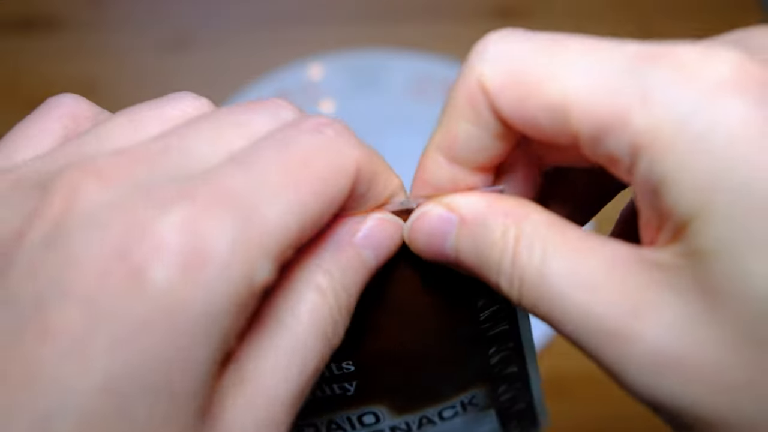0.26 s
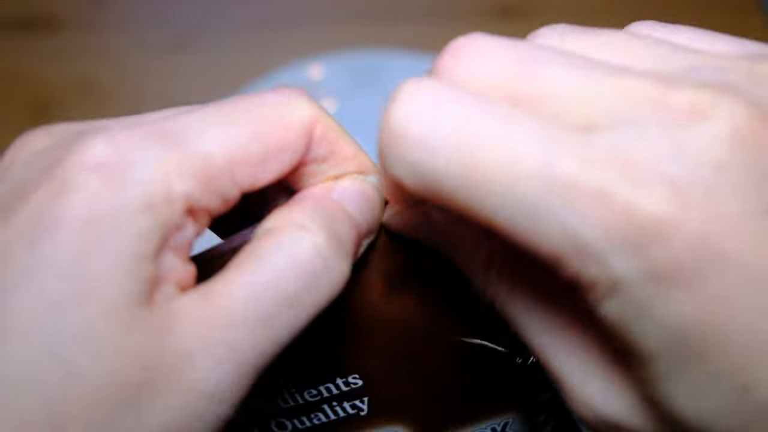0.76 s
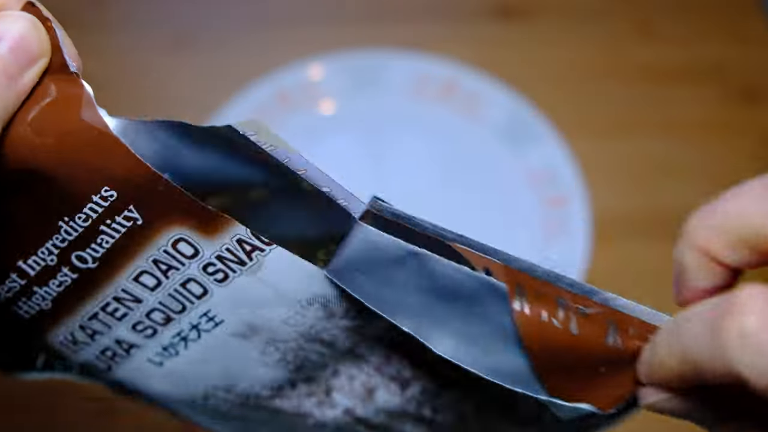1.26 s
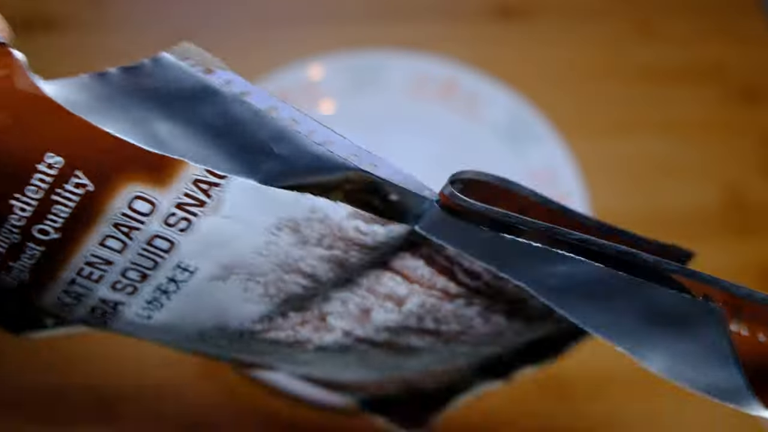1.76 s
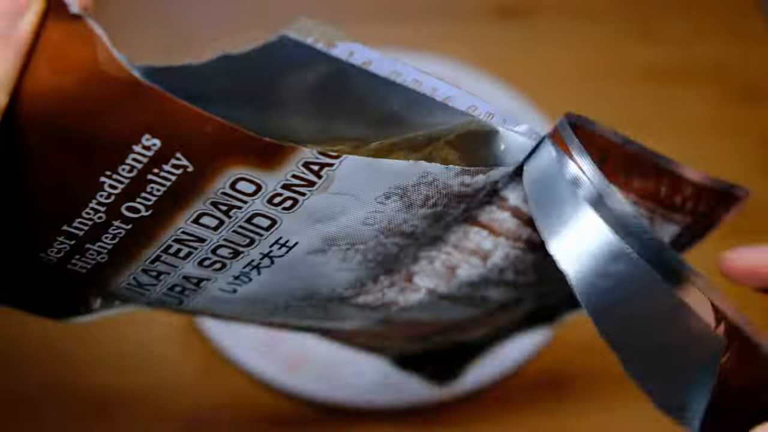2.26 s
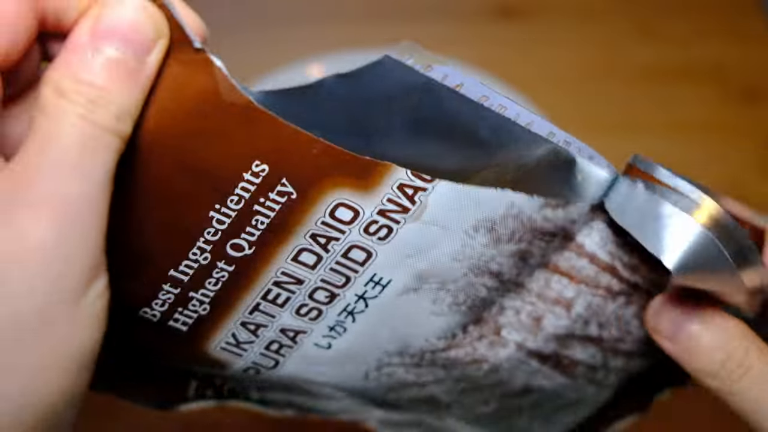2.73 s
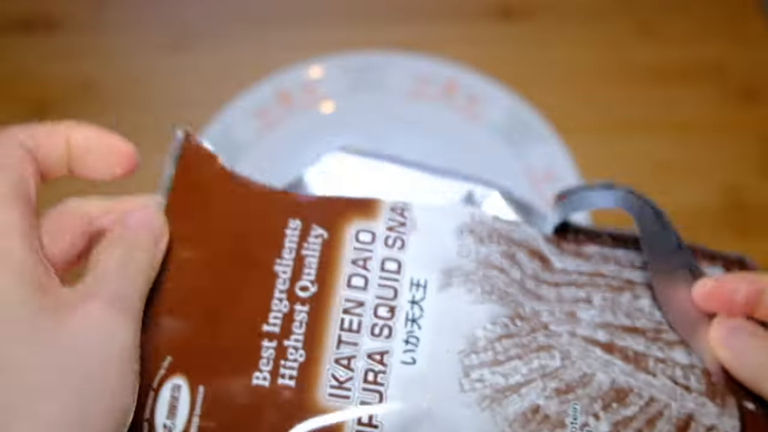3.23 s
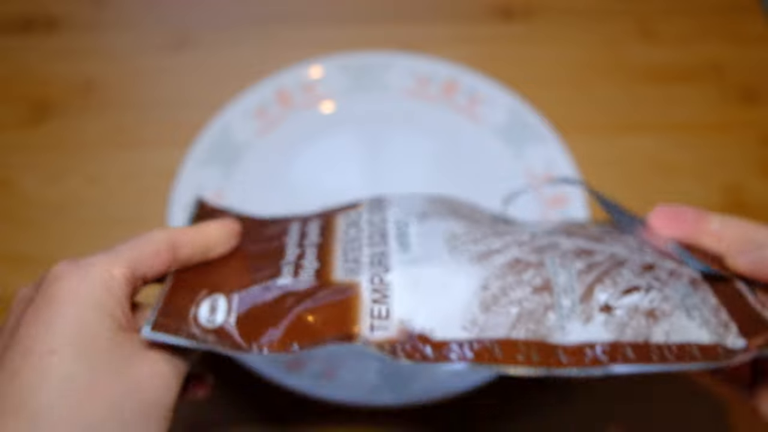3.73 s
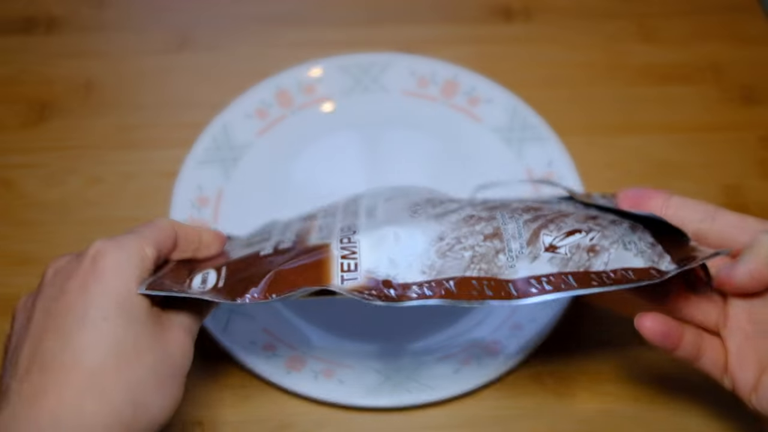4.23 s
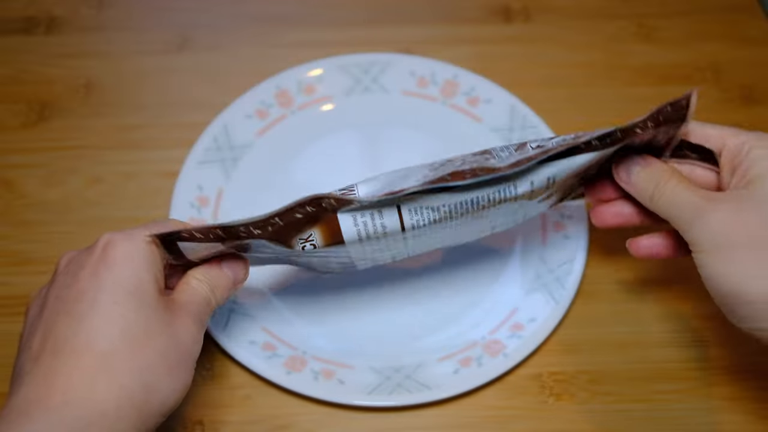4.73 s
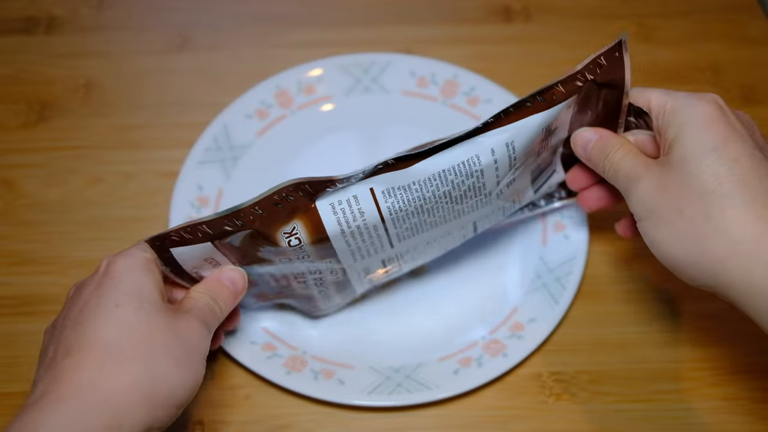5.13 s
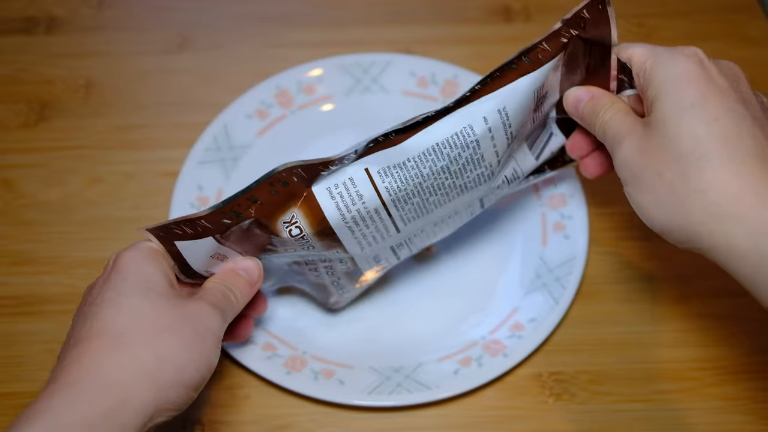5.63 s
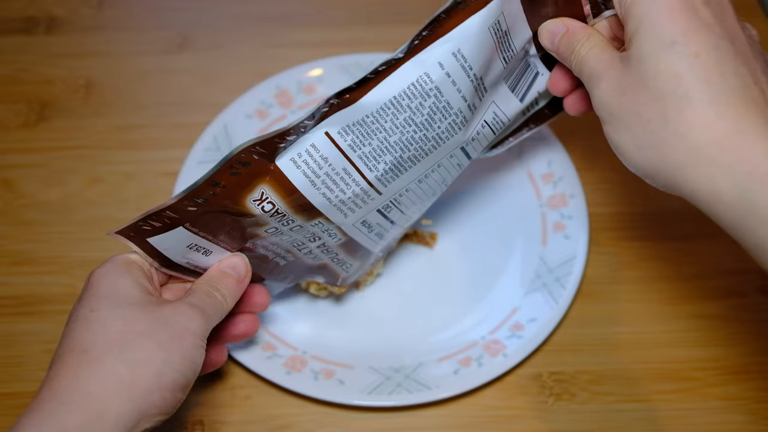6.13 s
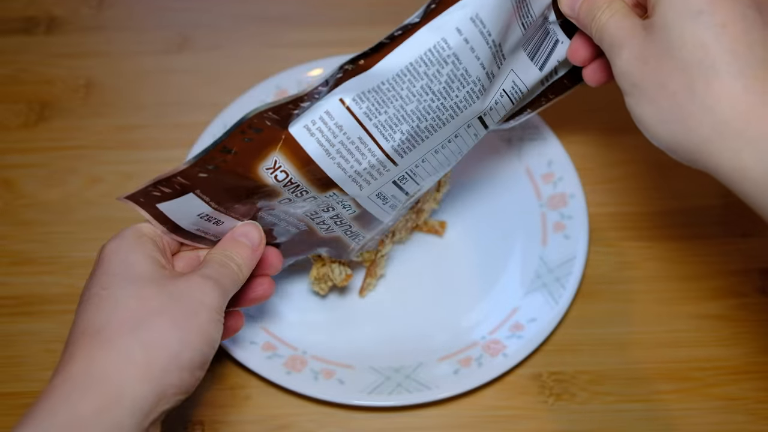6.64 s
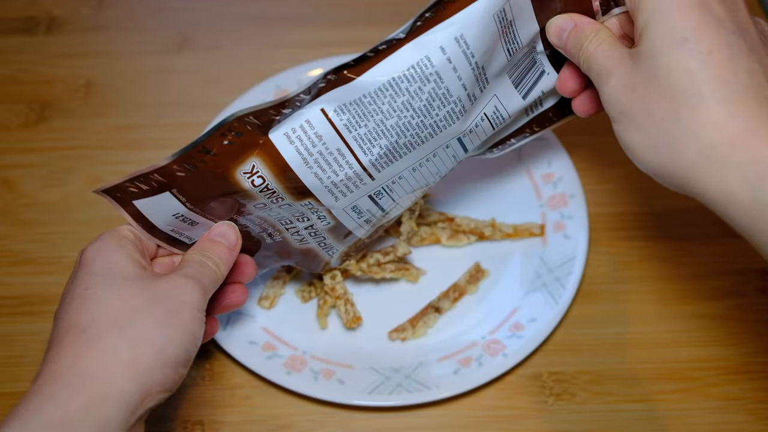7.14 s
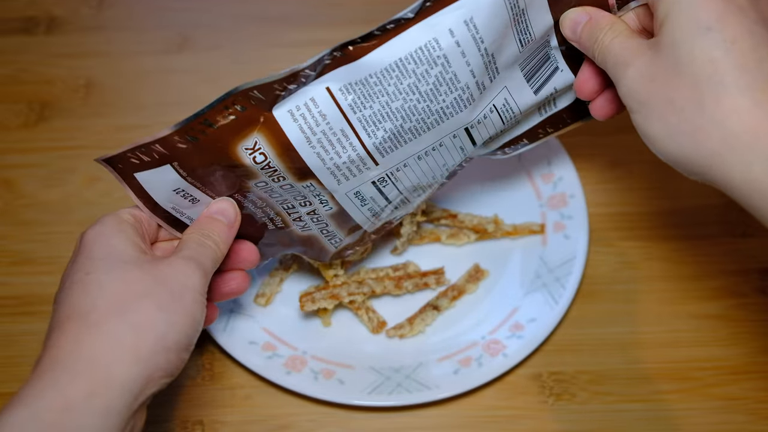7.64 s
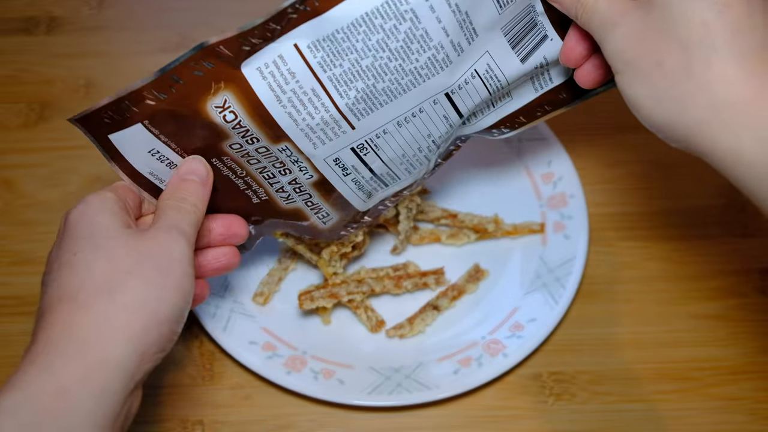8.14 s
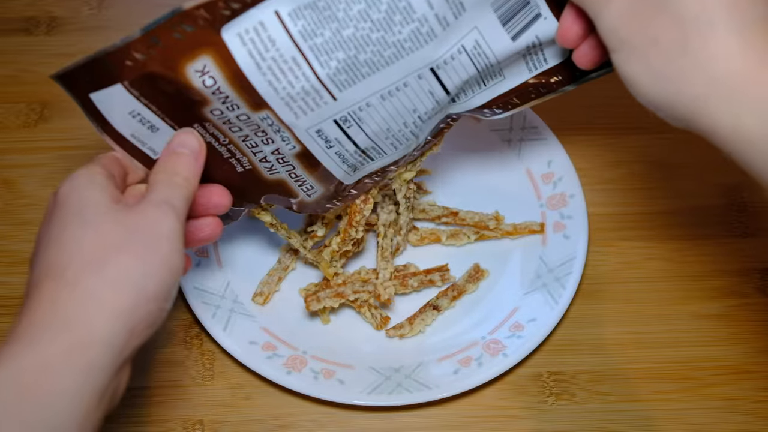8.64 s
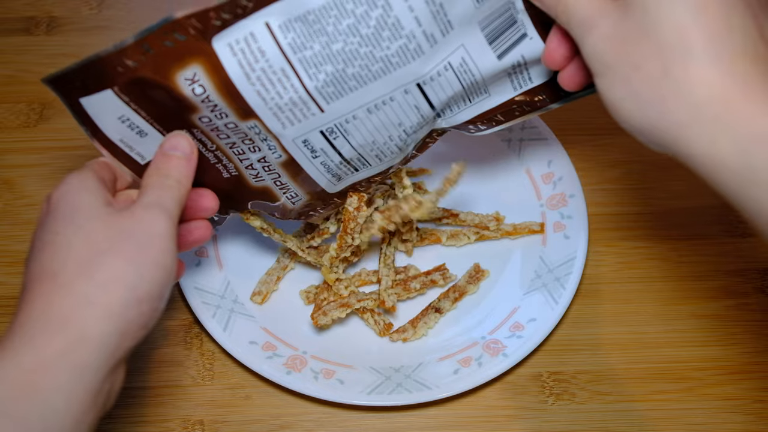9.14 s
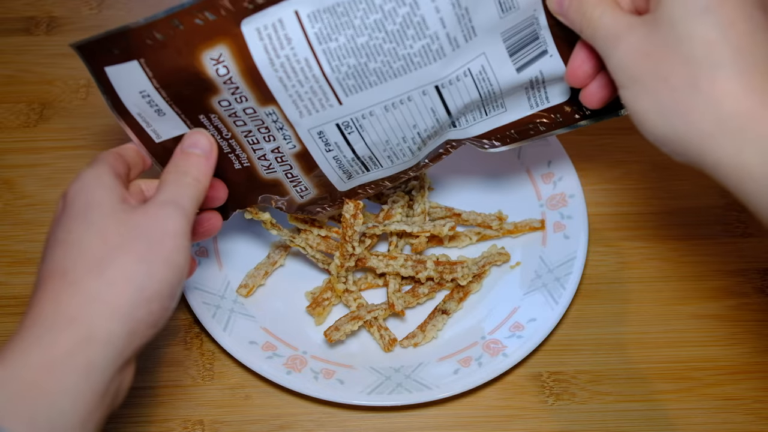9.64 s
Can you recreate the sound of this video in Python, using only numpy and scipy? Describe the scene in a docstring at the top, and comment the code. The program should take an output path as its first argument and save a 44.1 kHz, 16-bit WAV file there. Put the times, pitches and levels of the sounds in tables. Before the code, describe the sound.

Close up in a small quiet room, hands pinch and tear a foil-lined plastic bag: dry snaps, rustling, hollow film pops and a short bright rip. Crackling grows dense as the bag is handled, then thins. Dry crisp strips scrape out and land on a china plate with light clicks and short dull rings, becoming sparse and faint. Close stereo microphone, soft low room rush.

```python
"""Opening a snack bag over a plate

A foil-lined bag is pinched, torn open and tipped over a china plate, close to a stereo microphone in a small room.
Clicks make the snaps of the stiff film, short sine tones its hollow pops, bright noise the tearing seam.
Streams of tiny clicks make the rustle under each grip and the scrape of strips sliding out.
Dry, crisp strips land with a click and a ring of the plate; changing echoes and steady noise make the room."""
import sys
import numpy as np
from scipy import signal
from scipy.fft import rfft, irfft, next_fast_len
from scipy.io import wavfile
from scipy.ndimage import uniform_filter1d, map_coordinates

SR = 44100
rng = np.random.default_rng(int(sys.argv[2]) if len(sys.argv) > 2 else 0)


def store_pcm(level_fs):
    """Save levels as 16-bit WAV."""
    pcm = np.round(np.clip(level_fs, -1, 1) * 32767).astype(np.int16)
    wavfile.write(sys.argv[1], SR, np.atleast_2d(pcm).T)


N = 436149  # length of the scene in samples
TAPS = 2048  # length of one click in samples

# the film buckles: t/s, level/dB, panel flex/dB re level, crack/dB re level, flutter after the buckle/dB
BUCKLES = [(0.1337, -35.5, -5, -15, -4.5), (0.151, -27.5, -18, -21, 12), (0.1581, -22, -12.5, -6, 20),
           (0.3524, -48, 0, -27, 3), (0.4289, -35.5, -7.5, -16, -1), (0.4447, -36, -1, -22, 5),
           (0.5323, -43, -8, -23, -2), (0.566, -34.5, -1, -22, 2), (0.581, -39, -4, -22, 2),
           (0.613, -20.5, -9.5, -12.5, 16), (0.6847, -38.5, -3, -19, 13), (0.7742, -27.5, 2, -9.5, -8),
           (0.79, -32, -11, -24, 5), (0.829, -25, -13, -15, -8), (0.854, -26, -15, -21, -5),
           (0.9849, -26.5, -11, -7, -10), (1.0144, -42, 1, -14, 12), (1.0608, -23.5, -10, -6.5, -4),
           (1.0809, -21.5, -2, -6, 17), (1.1286, -24, -19, -12, -4), (1.145, -32.5, 3, -10, 9),
           (1.167, -33, -16, -13, -6), (1.2515, -28, -10.5, -21, 15), (1.2993, -37, -14, -19, 1),
           (1.3609, -50.5, 12, -3, 11), (1.4103, -41.5, -8, -26, 1), (1.455, -20.5, -5, -13, 7),
           (1.474, -20.5, -11, -8, 6), (1.6032, -35, -0.5, -34, -2), (1.6132, -30.5, -5.5, -14, 2),
           (1.7263, -28, -2, -8, -14), (1.77, -36, -8, -8, 7), (1.909, -34.5, 0, -20, 8),
           (1.916, -30.5, -1.5, -11, 14), (2.005, -34.5, -6, -33, 1), (2.024, -26.5, -4.5, -6.5, 2),
           (2.0633, -23.5, -16, -17.5, -2), (2.1162, -33.5, -1, -18, 8), (2.132, -47, -6, -1, -4),
           (2.2003, -37.5, -1, -2, 15), (2.277, -45.5, -2, -2, 1), (2.5329, -48.5, 6, -13, 3),
           (2.5847, -46.5, 4, -4, 8), (2.602, -26.5, -11, -4, -4), (2.6192, -33.5, -13, -28, 0),
           (2.673, -41, 12.5, -6, -4), (2.703, -48, -7, 10, -9), (2.7419, -38, -3, 3, 0),
           (2.7545, -29, -2, -14, -3), (2.79, -30.5, -1, -38, 2), (2.807, -24.5, -10, -8, 5),
           (2.817, -32, 2, -0.5, -2), (2.846, -35, -4, -22, -6), (2.87, -35, -5, -13, -7),
           (2.8746, -19, -13, -13.5, 15), (2.886, -27, -5.5, -7, 3), (2.8908, -29, 4.5, -0.5, -7),
           (2.9628, -26, -2.5, -5, 2), (2.9729, -36, -2, -21, 0), (2.986, -33.5, -3, -15, -12),
           (3.1011, -20, -5, -16, 2.5), (3.1352, -29, -11, -13, -3), (3.154, -19.5, -18, -13.5, -8),
           (3.165, -22.5, -16, -38, 12), (3.214, -31, -8, -33, -3), (3.2375, -21, -32, -21, -11),
           (3.255, -25, -2.5, -16, 10), (3.286, -31, -3.5, -28, -1), (3.3604, -22.5, -37, -12, -9),
           (3.378, -34, 0.5, -8, -3), (3.415, -43, -8, -21, 2), (3.4395, -39, 0, -11, 5),
           (3.49, -30.5, -2.5, -13, 3), (3.4971, -26.5, 0.5, -7, -7), (3.527, -32, -2, -18, -6),
           (3.6085, -38.5, -10, -17, 3), (3.6598, -26, -26, -9, -9), (3.668, -26, -10, -26, 12),
           (3.698, -28, -7, -13.5, 6), (3.714, -32, -19, -14, -9), (3.8003, -45, -6, -22, 6),
           (3.834, -24.5, -3, -6.5, -7), (3.9125, -40.5, 3, -3.5, -8), (4.1449, -43, -4, -4, -11),
           (4.1648, -41.5, 2.5, -39, -9), (4.3408, -46, -1, -13, -7), (4.3756, -32.5, -6, -4, 0),
           (4.5157, -37.5, -17, -28, -12), (4.547, -37, -6, -10, 7), (4.5581, -36, -8, -11, 18),
           (4.5918, -22.5, -25, -13.5, 7), (4.709, -29, -27, -28, -4), (4.7203, -28.5, -9, -26, 5),
           (4.7522, -30.5, -8, -12, -10), (4.77, -26.5, -6, -19, 15), (4.7946, -25.5, -23, -10, 0),
           (4.823, -36.5, -14, -1, -6), (4.842, -39, -7, 2, -12), (4.9251, -39, 10, 0.5, 1.5),
           (4.967, -35.5, -7, -3.5, -1), (5.0151, -32, -24, -27, 4), (5.2134, -38.5, -18, -22, 2),
           (5.3315, -35, -5, -32, -2), (5.3763, -26, -20, -14.5, 3), (5.4514, -46.5, 15.5, -20, -1),
           (5.475, -39, -14, -11, -6), (5.6907, -25.5, 1, -11.5, 5.5), (5.707, -32.5, -0.5, -20, -3),
           (6.316, -46.5, 5, 0.5, 0), (9.7795, -43, -1, -6.5, 1), (9.88, -36.5, -3, -11, 1)]
# strips land: t/s, level/dB, knock/dB re level, crack/dB re level, rattle after the touch/dB
LANDINGS = [(6.0572, -27, -8, -20, 5), (6.102, -34, 0, -13, 12), (6.1546, -33, -18, -21, 9),
            (6.638, -22.5, -9, 0.5, -8), (6.751, -34, -22, -24, -8), (6.7714, -27.5, -4.5, -13, 2),
            (6.816, -38.5, -24, -6, 3), (6.92, -48, -5, 5.5, 8), (6.937, -39, -13, -32, 1),
            (6.986, -40, -3, -6, 0), (7.008, -31, -20, -12, -3), (7.046, -40, 1, -5, 6),
            (7.26, -45.5, -6, -6, 0), (7.3325, -36.5, -3.5, -28, 4), (7.35, -38.5, -9, -14, 2),
            (7.397, -43, -20, -14, 3), (7.4206, -33.5, 5, -7, 5), (7.5842, -37, -8, -34, 7),
            (7.6728, -44.5, 5, -16, 7), (7.8486, -36.5, 1.5, -25, -2), (8.028, -34.5, -7, -18, 19),
            (8.354, -52.5, -10, -1, 5), (8.434, -47.5, -3, -12, 1), (8.514, -46.5, -1, -4, -4),
            (8.534, -36, -6.5, -5.5, 9), (8.592, -52.5, -7, 0, -3), (8.924, -52.5, -6, 0, 5),
            (9.0988, -40, -5, -4.5, 10), (9.129, -49.5, -8, 5.5, 0), (9.188, -49.5, -12, 0, 13),
            (9.2742, -46, -1, -4, 9), (9.3092, -45.5, 0, -3.5, 3), (9.4325, -48, -20, -15, -7),
            (9.4758, -53, 14.5, -28, 7)]
# colour of the flexing panels, low: f/Hz, relative density/dB per Hz
FLEX_COLOUR = [(30, -52), (70, -12), (130, -3.5), (220, -0.5), (380, 3.5), (600, 0), (900, -4), (1600, -12),
               (4000, -101)]
# colour of the crinkling creases, middle: f/Hz, relative density/dB per Hz
CRINKLE_COLOUR = [(200, -43), (500, -2), (800, 0), (1300, 1.5), (2000, 1), (2700, -4), (3500, -12),
                  (4800, -24), (8000, -60)]
# colour of the fizzing film, high: f/Hz, relative density/dB per Hz
FIZZ_COLOUR = [(1500, -43), (3000, 4.5), (4000, 1), (5500, -2.5), (7000, -10.5), (8500, -20), (10000, -18),
               (12500, -31.5), (15500, -39)]
# colour of the dry batter, high: f/Hz, relative density/dB per Hz
BATTER_COLOUR = [(1500, -21), (2700, 7.5), (4000, 0), (5500, -1.5), (7500, -13.5), (9000, -15.5),
                 (10500, -16.5), (11800, -30), (15500, -38)]


def amp(db):
    """Turn decibels into a plain factor."""
    return 10 ** (np.asarray(db) / 20)


def unit(x):
    """Scale to rms 1."""
    return x / np.sqrt(np.mean(x ** 2) + 1e-20)


def along(points, hz):
    """Read a curve of (Hz, value) points on a log frequency axis."""
    f, value = np.transpose(points)
    return np.interp(np.log(hz + 1), np.log(f + 1), value)


def filtered(x, response):
    """Multiply the spectrum of x by a response of frequency."""
    size = next_fast_len(N + SR // 2)
    hz = np.fft.rfftfreq(size, 1 / SR)
    return irfft(rfft(x, size) * response(hz), size)[..., :N]


def add(track, s, sound):
    """Mix a sound into a track at time s."""
    start = max(0, round(s * SR))
    part = track[..., start:start + sound.shape[-1]]
    part += sound[..., :part.shape[-1]]


def causal(gain):
    """Make the sharpest pulse with this spectrum that does not start before its cause."""
    cepstrum = irfft(np.log(np.maximum(gain, 1e-6)))
    cepstrum[1:TAPS // 2] *= 2
    cepstrum[TAPS // 2 + 1:] = 0
    return irfft(np.exp(rfft(cepstrum)))


def facet(depth_db, count=36):
    """Each facet of the film has broad resonances of its own: a random gain over log frequency."""
    place = np.log1p(np.fft.rfftfreq(TAPS, 1 / SR) / 400)
    bumps = rng.standard_normal(count + 1)
    curve = map_coordinates(bumps, [place / place[-1] * count], mode="nearest")
    return amp(depth_db * curve)


def click(treble, db, flex_db, crack_db, flutter_db, flutter_t60, facet_db, lag=.0004):
    """A sudden buckle, then a few ms of flutter; db sets the crinkle part of the buckle."""
    hz, t = np.fft.rfftfreq(TAPS, 1 / SR), np.arange(TAPS) / SR
    # neighbouring creases follow
    chatter = rng.standard_normal(TAPS) * amp(3.8 * rng.standard_normal(TAPS))
    flutter = unit(chatter * amp(-60 * t / flutter_t60) * (1 - np.exp(-t / 0.00057)))
    buckle = t == 0
    force = rfft(buckle + amp(flutter_db) * flutter / np.sqrt(TAPS))

    # a small crease moves little of the panel, cracks harder and sounds higher
    octaves = np.clip(0.18 + 0.016 * crack_db - 0.017 * flex_db, -.6, .6)
    flex = amp(flex_db) * unit(amp(along(FLEX_COLOUR, hz)))
    crinkle = unit(amp(along(CRINKLE_COLOUR, hz / 2 ** octaves)))
    crack = amp(crack_db - 2.0) * unit(amp(along(treble, hz)))  # 2 dB below the listed crack
    power = flex ** 2 + crinkle ** 2 + crack ** 2
    own = facet(facet_db) ** 2
    power = power * own / np.average(own, weights=power)

    # the film, not the force, sets the broad colour
    even = uniform_filter1d(np.abs(force) ** 2, size=21)
    pulse = rfft(causal(np.sqrt(power / even)))
    # bending waves: lows arrive later, by lag seconds at 1 kHz
    bending = np.exp(-4j * np.pi * lag * np.sqrt(1000 * hz))
    span = .006 * SR  # the level counts the energy as if spread over 6 ms
    return rng.choice([-1, 1]) * amp(db) * np.sqrt(span) * irfft(force * bending * pulse)


def grains(spectrum, rate, spread_db, facet_db, size=512):
    """A stream of tiny clicks, rate per second, of rms 1; every size samples another facet takes over."""
    shape = amp(along(spectrum, np.fft.rfftfreq(TAPS, 1 / SR)))
    chance = rng.uniform(-1, 1, N)
    happens = np.abs(chance) < rate / SR
    strength = amp(spread_db * np.clip(rng.standard_normal(N), -2, 2))
    kicks = np.sign(chance) * happens * strength
    out = np.zeros(N)
    for i in range(0, N, size):
        pulse = unit(causal(shape * facet(facet_db)))
        add(out, i / SR, signal.fftconvolve(kicks[i:i + size], pulse))
    return unit(out)


def snaps():
    """Creases of the stiff film flip over, one by one."""
    out = np.zeros(N)
    for s, db, flex_db, crack_db, flutter_db in BUCKLES:
        snap = click(FIZZ_COLOUR, db, flex_db, crack_db, flutter_db, flutter_t60=0.017, facet_db=3.0)
        add(out, s, snap)
    return out


def pops():
    """A panel flips over and rings briefly on the air in the bag: a low, hollow pop."""
    # whole panels pop through: t/s, pitch f/Hz, level/dB
    panels = [(0.7743, 590, -30), (1.359, 141, -32), (1.8, 211, -20.5), (2.673, 596, -30),
              (2.751, 205, -34), (3.4967, 718, -27), (4.925, 304, -31), (4.967, 360, -33),
              (5.495, 444, -34), (5.69, 480, -26.5)]
    t60_s, attack_s = 0.08, 0.0028
    out, t = np.zeros(N), np.arange(SR // 4) / SR
    for s, hz, db in panels:
        envelope = amp(db - 60 * t / t60_s) * (1 - np.exp(-t / attack_s))
        add(out, s, envelope * np.sin(2 * np.pi * hz * t))
    return out


def rips():
    """The seam parts in short, very bright spurts of noise."""
    # the sealed seam gives way: t/s, level/dB, t60/s
    spurts = [(1.4732, -28, 0.059), (1.7256, -44, 0.14), (1.771, -49, .02), (1.801, -49, .02),
              (2.196, -39, .012), (2.2766, -67, 0.045)]
    # colour of parting foil: f/Hz, relative density/dB per Hz
    seam_colour = [(4000, -40), (8000, -14), (10000, -5), (12800, -10), (15300, -20), (16500, 4)]
    envelope, t = np.zeros(N), np.arange(SR // 4) / SR
    for s, db, t60 in spurts:
        add(envelope, s, amp(db - 60 * t / t60))
    hiss = filtered(rng.standard_normal(N), lambda hz: amp(along(seam_colour, hz)))
    return envelope * unit(hiss)


def strokes(moves, blows):
    """Strength of three bands: a swell for each move, and a short settling after each blow."""
    attack_s, release_db_per_s = 0.039, 290
    settle_db, settle_db_per_s = -20, 325  # creases settle around a snap or a landing
    power, t = np.zeros((3, N)), np.arange(SR) / SR
    for s, length, *levels_db in moves:
        release_s = np.maximum(t - attack_s / 2 - length, 0)
        swell = np.clip(t / attack_s, 0, 1) * amp(-release_db_per_s * release_s)
        add(power, s - attack_s / 2, np.outer(amp(levels_db), swell) ** 2)
    for s, db, flex_db, crack_db, _ in blows:
        settling = amp(settle_db - settle_db_per_s * t)
        add(power, s, np.outer(amp([db, db + flex_db, db + crack_db]), settling) ** 2)
    return np.sqrt(power)


def strays(crinkle, count=300):
    """Now and then a larger crease ticks; the harder the bag is worked, the louder."""
    stray_db, spread_db = 3, 3.0  # typical level over the crinkle, and its scatter
    out = np.zeros(N)
    places = (np.arange(count) + rng.random(count)) / count  # one in each equal slice of the scene
    sizes = np.clip(rng.standard_normal(count), -2, 2)
    for place, size in zip(places, sizes):
        tick = click(FIZZ_COLOUR, stray_db + spread_db * size, flex_db=-4, crack_db=-11.5,
                     flutter_db=-2.5, flutter_t60=0.016, facet_db=4.0)
        add(out, place * N / SR, crinkle[int(place * N)] * tick)
    return out


def rustle():
    """Countless small creases move under the hands; sliding strips add a more even scrape."""
    # hands pinch, pull or turn the bag: start t/s, length/s, crinkle/dB, panel flex/dB, fizz/dB
    grips = [(0.0, 0.01, -54.5, -57, -76), (0.15, 0.019, -34, -44, -45.5), (0.2, 0.071, -51, -60, -64),
             (0.56, 0.13, -64, -47.5, -71), (0.78, 0.19, -50, -53, -61), (0.995, .16, -37, -34, -47.5),
             (1.17, 0.12, -44, -48, -56), (1.36, 0.15, -52, -57, -61.5), (1.49, 0.069, -57, -53, -55),
             (1.66, 0.07, -50, -48, -54.5), (1.73, 0.057, -37.5, -35.5, -48),
             (1.95, 0.093, -48, -45.5, -65), (2.13, .1, -56, -48.5, -62), (2.61, 0.077, -51, -48, -62),
             (2.71, 0.17, -53, -45.5, -60), (2.96, 0.019, -37.5, -40.5, -53), (3.025, 0.043, -48, -54, -60),
             (3.08, 0.015, -32, -43, -47), (3.12, .15, -45, -46, -56), (3.35, 0.19, -44, -45.5, -57.5),
             (3.66, 0.04, -38.5, -43, -61), (3.74, 0.23, -52, -50.5, -64), (4.13, 0.07, -53.5, -52, -64),
             (4.345, 0.023, -39, -44, -52), (4.44, 0.28, -53, -50.5, -66), (4.56, 0.038, -33.5, -39, -54),
             (4.64, .07, -46, -46, -59), (4.73, 0.13, -36.5, -41.5, -49.5), (4.88, .15, -46, -40, -63),
             (5.29, 0.055, -60, -50, -74), (5.47, 0.031, -55, -44, -64), (5.6, 0.15, -55, -47, -68)]
    # strips slide down the tipped bag: start t/s, length/s, crinkle/dB, panel flex/dB, batter scrape/dB
    slides = [(5.89, 0.21, -52, -48.5, -62.5), (6.05, 0.11, -51, -46, -62), (6.315, 0.094, -43, -44, -55.5),
              (6.585, .05, -41, -52.5, -49), (6.645, 0.043, -40, -39, -70), (6.74, 0.22, -44.5, -43.5, -56),
              (7.0, 0.098, -42.5, -41, -53), (7.18, 0.27, -59, -56.5, -70),
              (7.86, 0.24, -55.5, -51.5, -62.5), (8.16, 0.14, -57, -53, -60), (8.8, 0.39, -66.5, -63, -75),
              (9.08, 0.044, -53, -48.5, -58), (9.27, 0.075, -54.5, -51, -62.5),
              (9.485, 0.011, -42.5, -44, -41.5), (9.81, .08, -53, -59, -61)]
    crinkle, flex, fizz = strokes(grips, BUCKLES)
    rub, sag, scrape = strokes(slides, LANDINGS)
    out = np.hypot(flex, sag) * grains(FLEX_COLOUR, rate=900, spread_db=3.0, facet_db=3, size=2048)
    out += crinkle * grains(CRINKLE_COLOUR, rate=360, spread_db=4, facet_db=5.0)
    out += strays(crinkle)
    out += fizz * grains(FIZZ_COLOUR, rate=1600, spread_db=1.5, facet_db=2.5, size=1024)
    out += rub * grains(CRINKLE_COLOUR, rate=800, spread_db=4.0, facet_db=3.0)
    out += scrape * grains(BATTER_COLOUR, rate=1100, spread_db=1.0, facet_db=3.0, size=1024)
    return out


def strips():
    """Each light, dry strip ticks as it lands; the heavier its knock, the more the plate rings."""
    # tones of the china plate on its wooden table: f/Hz, relative level/dB, t60/s
    plate_tones = [(382, -13, 0.12), (590, -2.5, 0.26), (995, -14, 0.14), (1228, 9.5, 0.074),
                   (2500, -8, 0.12), (3160, -35, .1)]
    scatter_db = 2.5  # each landing excites the tones a little differently
    out, t = np.zeros(N), np.arange(SR // 2) / SR
    for s, db, knock_db, crack_db, rattle_db in LANDINGS:
        tick = click(BATTER_COLOUR, db, knock_db, crack_db, rattle_db, flutter_t60=0.015, facet_db=5.0)
        add(out, s, tick)
        ring = np.zeros(len(t))
        for hz, level, t60 in plate_tones:
            envelope = amp(level + rng.normal(0, scatter_db) - 60 * t / t60)
            ring += envelope * np.sin(2 * np.pi * hz * t)
        add(out, s, amp(db + knock_db - 11.0) * ring)
    return out


def echoes(near_db, near_t60, room_db):
    """Two unrelated responses: quick returns from table and hands, then the tail of the room."""
    # how long the room rings: f/Hz, t60/s
    room_decay = [(100, 0.49), (400, 0.63), (2000, 0.45), (5000, 0.24), (13000, 0.29)]
    hz, t, z = signal.stft(rng.standard_normal((2, SR // 3)), SR, nperseg=256)
    fade = amp(-60 * t / along(room_decay, hz)[:, None])
    tail = signal.istft(z * fade, SR, nperseg=256)[1]
    t = np.arange(tail.shape[1]) / SR
    near = rng.standard_normal(tail.shape) ** 3 * amp(-60 * t / near_t60)  # cubing makes it sparse
    arrival = 1 - np.exp(-(t / 0.0069) ** 2)  # echoes build up over some 7 ms
    both = amp(near_db) * unit(near * arrival) + amp(room_db) * unit(tail * arrival)
    return both / np.sqrt(len(t))


def room(x):
    """The echoes change as the hands and bag move; the two capsules differ mostly in the treble."""
    # stereo width of the echoes: f/Hz, side re mid/dB
    echo_width = [(40, -8), (120, -43), (400, -27), (1200, -18.5), (2500, -9.5), (5000, 0), (9000, 3.5)]
    wet, hop = np.zeros((2, N)), SR // 4  # new echoes every quarter second
    for i in range(0, N, hop):
        response = echoes(near_db=-10.5, near_t60=0.065, room_db=-13.5)
        add(wet, i / SR, signal.fftconvolve(x[None, i:i + hop], response, axes=1))
    mid = wet[0]
    side = filtered(wet[1], lambda hz: amp(along(echo_width, hz)))
    return np.array([mid + side, mid - side])


def air():
    """The steady low rush of the room: coloured noise with a width that depends on pitch."""
    # colour of the quiet room: f/Hz, relative density/dB per Hz
    air_colour = [(25, -21), (55, -19.5), (110, -8), (200, -3.5), (290, -3.5), (370, 2), (480, -7),
                  (600, -6.5), (1100, -12), (1600, -17.5), (4400, -33), (12500, -48.5), (16000, -54)]
    # stereo width of the rush: f/Hz, side re mid/dB
    air_width = [(60, 1), (110, -8.5), (200, -9), (380, -13.5), (700, -8.5), (1290, -9.5), (2380, -4.5),
                 (4400, -2.5), (8120, -0.5), (15000, 1)]
    mid, side = filtered(rng.standard_normal((2, N)), lambda hz: amp(along(air_colour, hz)))
    mid = unit(mid)
    side = filtered(unit(side), lambda hz: amp(along(air_width, hz)))
    return amp(-50.0) * np.array([mid + side, mid - side])


def scene():
    """Bag and plate lie almost straight ahead, a touch to the left."""
    near = snaps() + pops() + rips() + rustle() + strips()
    left_db = 0.3
    return (near + room(near) + air()) * amp([[left_db], [-left_db]])


def record(dry):
    """A very steep low-pass: almost nothing is kept above the band limit."""
    top_hz = 16000
    return filtered(dry, lambda hz: 1 / np.sqrt(1 + (hz / top_hz) ** 160))


dry = scene()
out = record(dry)
store_pcm(out)
```